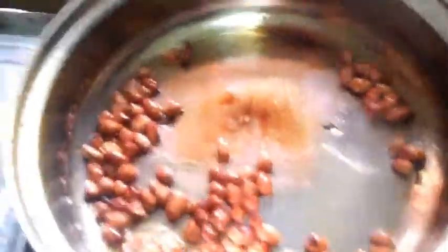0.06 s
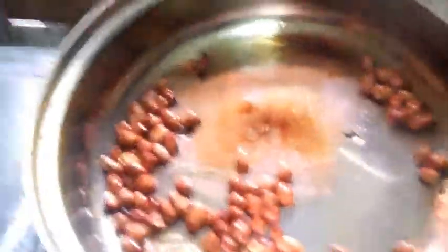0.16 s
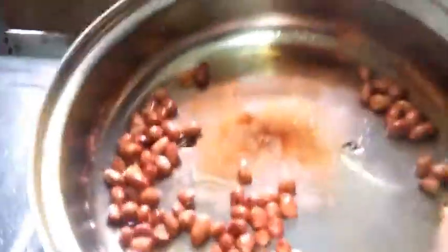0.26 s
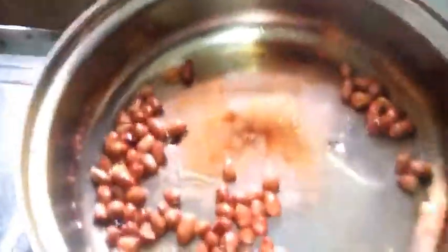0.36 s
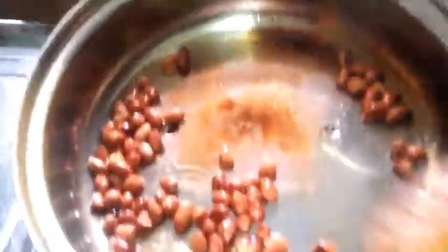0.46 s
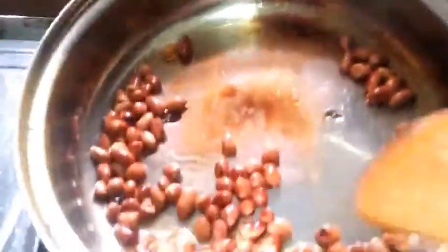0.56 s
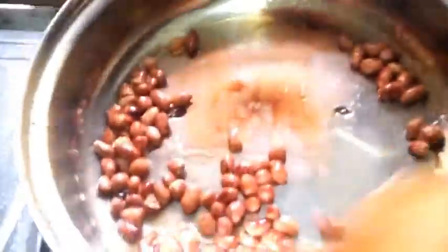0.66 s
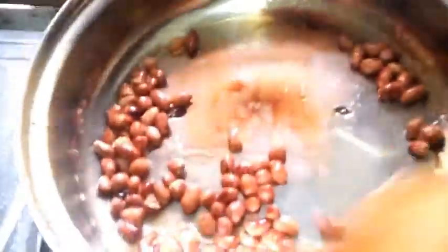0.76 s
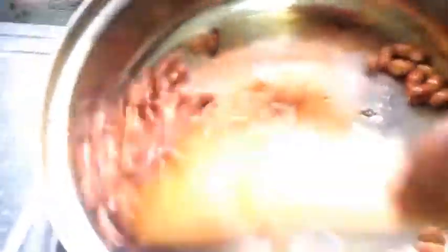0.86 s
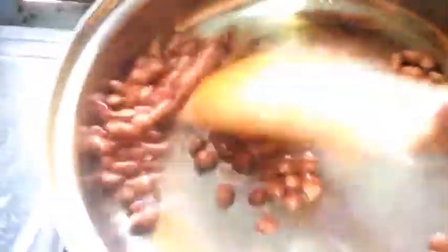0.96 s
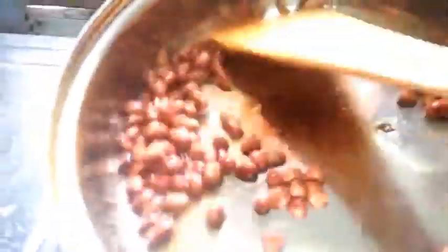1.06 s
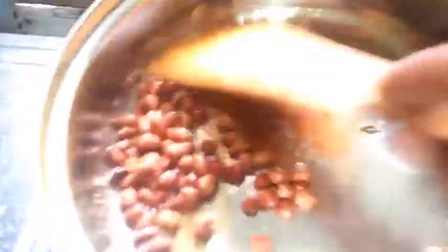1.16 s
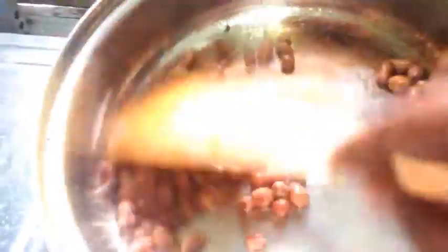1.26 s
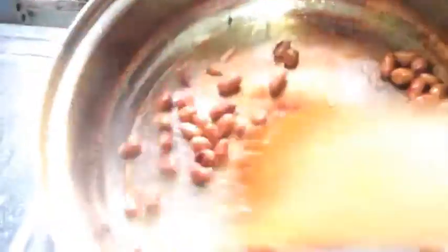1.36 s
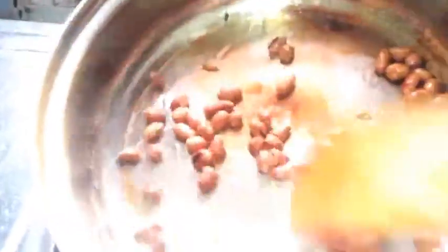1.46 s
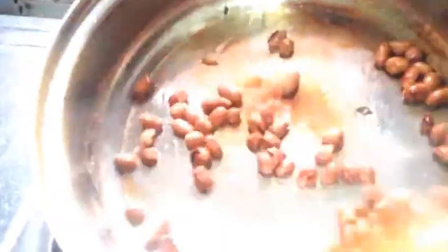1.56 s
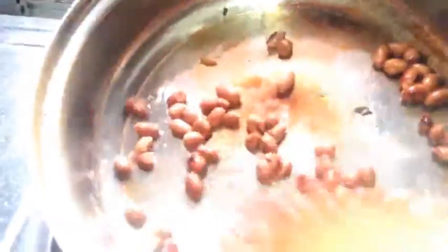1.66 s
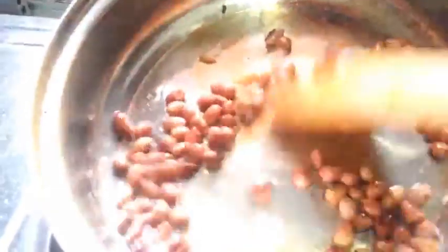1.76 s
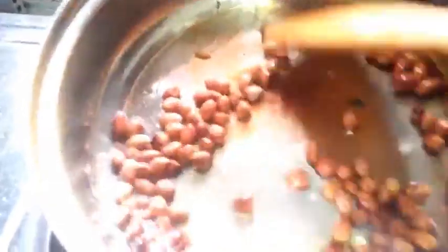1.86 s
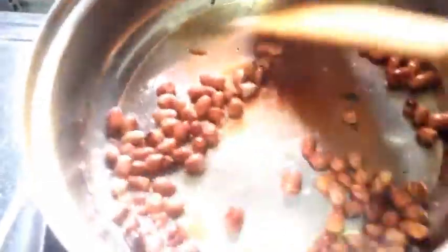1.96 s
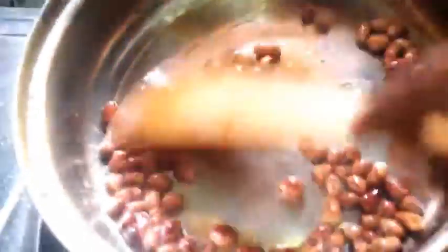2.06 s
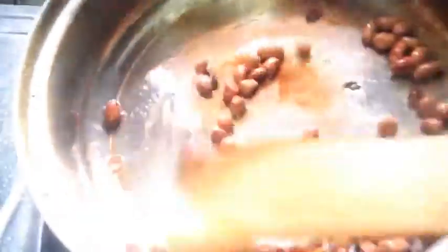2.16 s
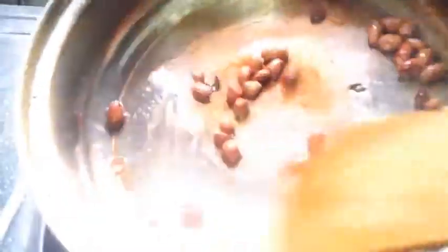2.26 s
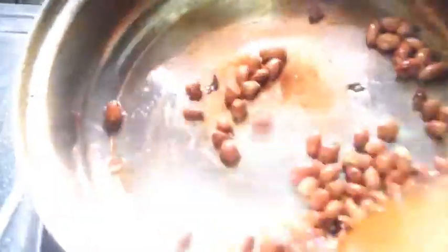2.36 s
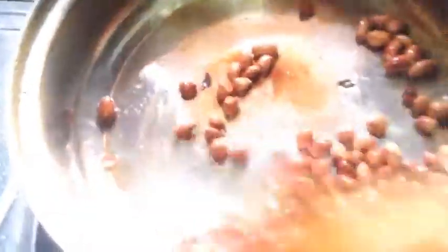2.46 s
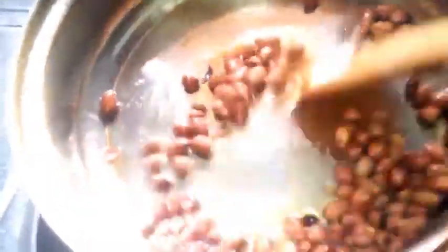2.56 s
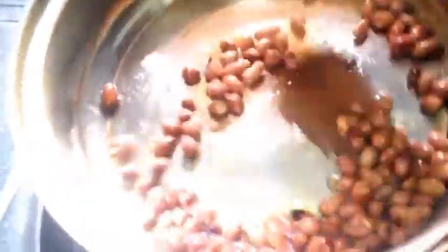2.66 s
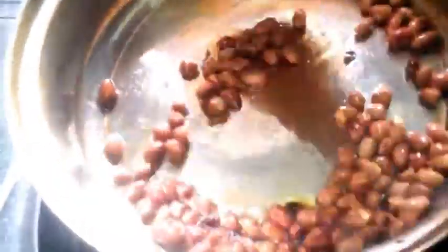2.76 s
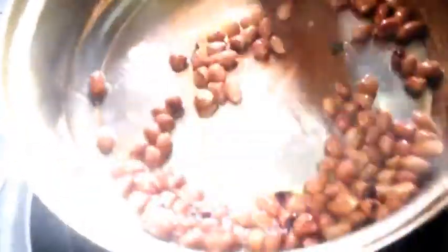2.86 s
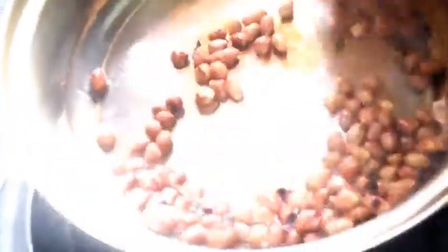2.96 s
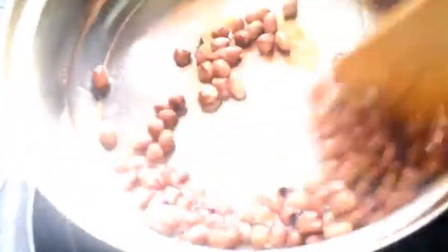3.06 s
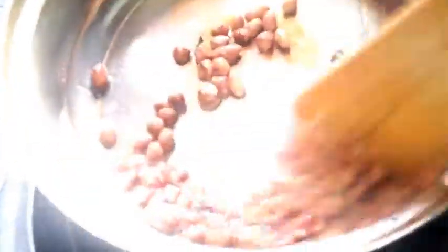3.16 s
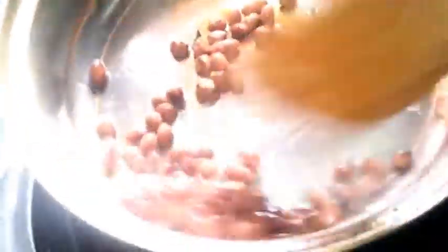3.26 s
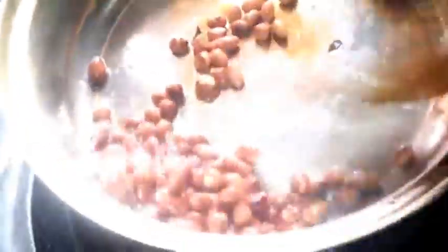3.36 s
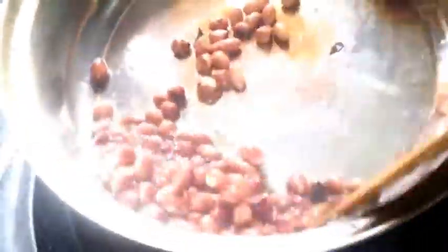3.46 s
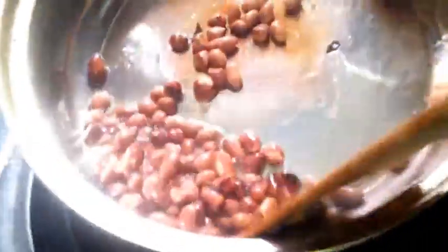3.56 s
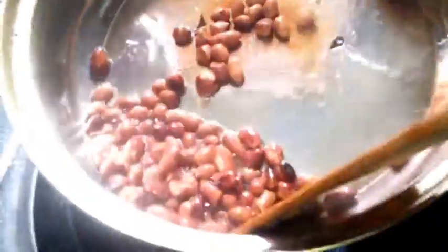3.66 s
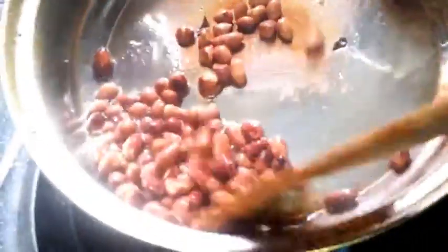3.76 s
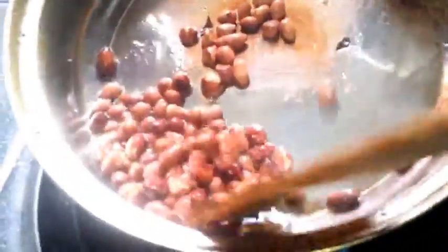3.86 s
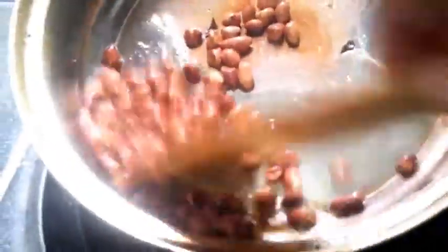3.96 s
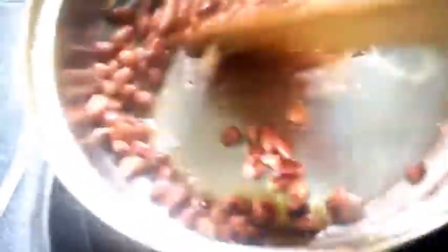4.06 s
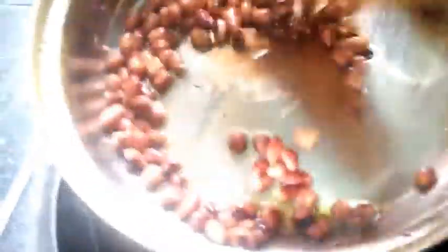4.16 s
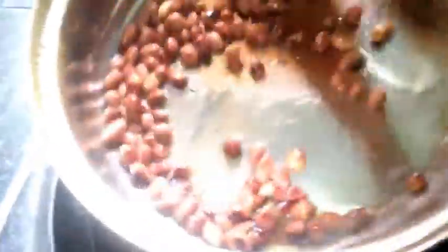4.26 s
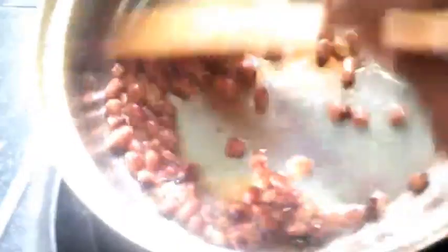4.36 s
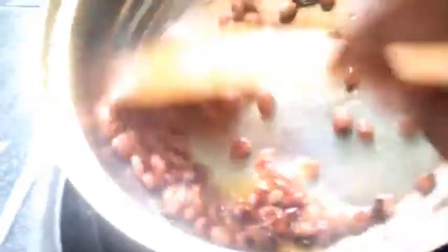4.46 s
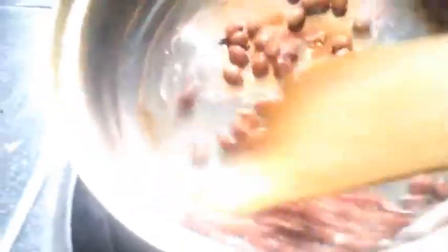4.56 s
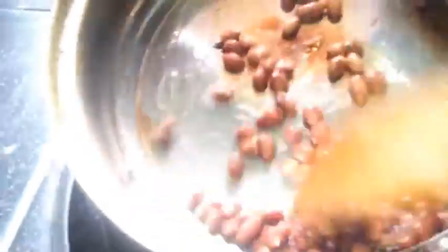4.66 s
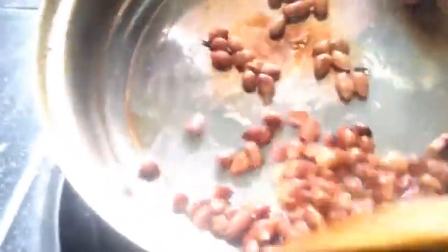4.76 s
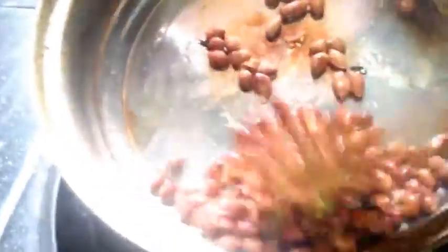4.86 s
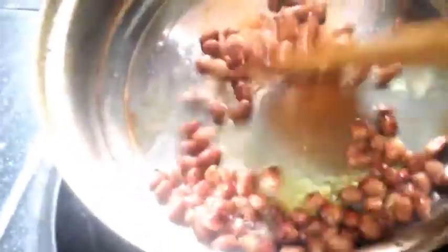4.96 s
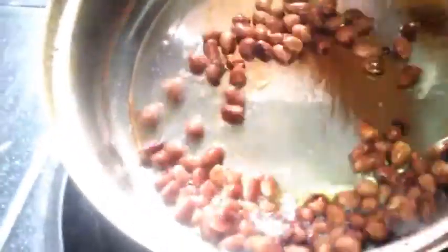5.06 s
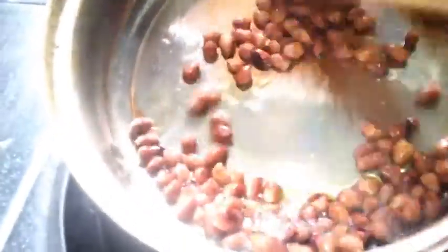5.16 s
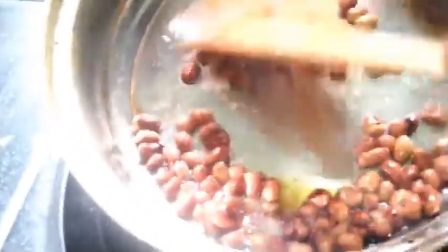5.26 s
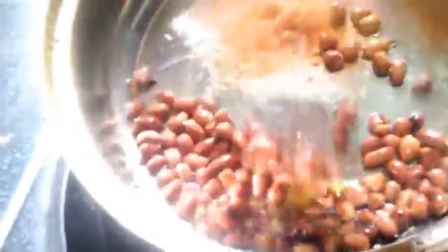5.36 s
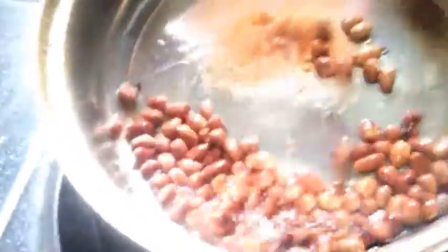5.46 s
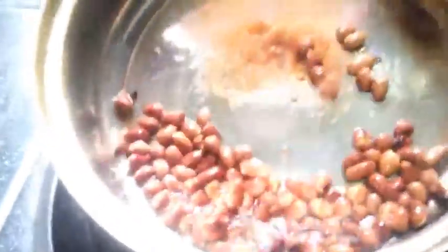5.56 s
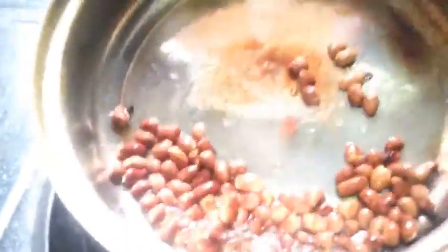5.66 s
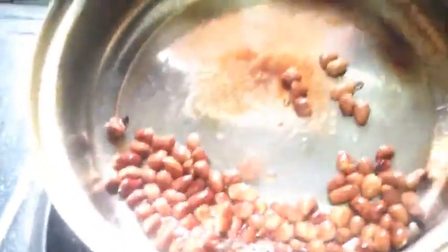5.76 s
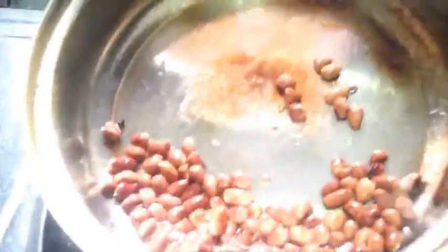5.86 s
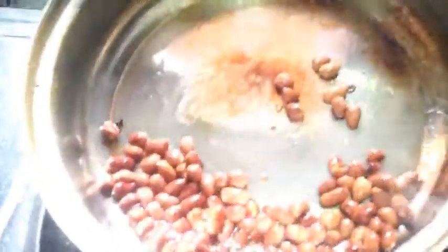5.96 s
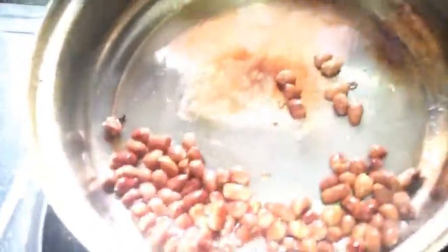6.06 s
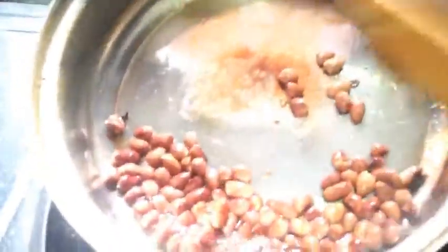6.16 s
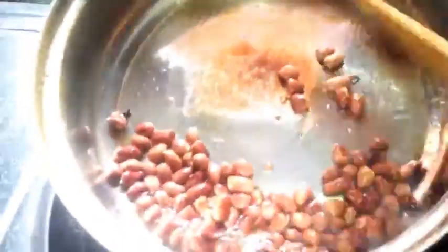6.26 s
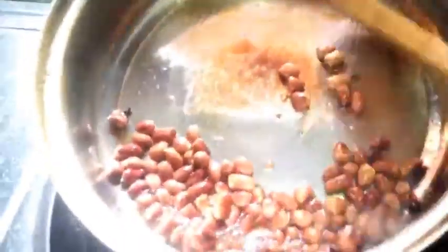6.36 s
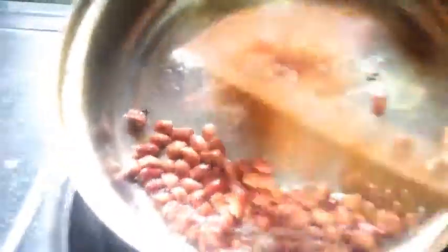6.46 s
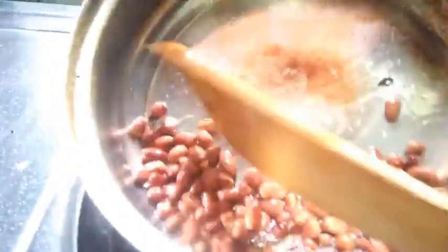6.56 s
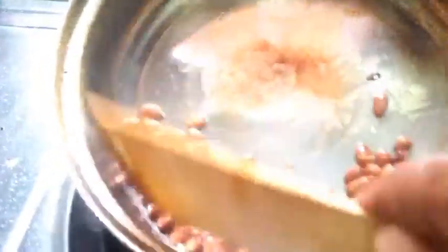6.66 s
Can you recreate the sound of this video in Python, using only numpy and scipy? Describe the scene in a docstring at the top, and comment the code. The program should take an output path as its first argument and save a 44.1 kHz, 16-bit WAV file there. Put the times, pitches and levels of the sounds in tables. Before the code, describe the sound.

Peanuts fry with a crisp, crackling sizzle in a steel pan while a wooden spatula knocks, scrapes and rattles them, giving one sharp squeak.

```python
"""In a small kitchen, peanuts fry in a little oil in a steel pan, heard from just above it.
Random clicks make the fizz; short noise bursts make the drops, and gliding tones the bubbles and steam.
A wooden spatula knocks and shoves the rattling nuts: noise bursts set the pan's notes ringing.
Once it sticks and slips with a sharp squeak, a wavering tone with overtones.
Filtered noise makes the quiet simmer and the stove's faint rumble underneath."""
import sys
import numpy as np
from scipy import signal
from scipy.fft import rfft, irfft
from scipy.io import wavfile
from scipy.ndimage import uniform_filter1d

SR = 44100
rng = np.random.default_rng(int(sys.argv[2]) if len(sys.argv) > 2 else 0)


def store_wav(level_fs):
    """Save 16-bit WAV to argv[1]."""
    pcm = np.round(np.clip(np.atleast_2d(level_fs), -1, 1) * 32767)
    wavfile.write(sys.argv[1], SR, pcm.T.astype(np.int16))


N = 295911


def undb(db):
    """Turn decibels into a gain."""
    return 10 ** (np.asarray(db) / 20)


def unit(x):
    """Scale to an rms of 1."""
    return x / np.sqrt(np.mean(x ** 2))


def energy(x):
    """Scale to a total energy of 1."""
    return x / np.linalg.norm(x)


def size_over(window_s, db):
    """Gain that gives a sound of energy 1 this level when averaged over the window."""
    return undb(db) * np.sqrt(window_s * SR)


def seconds(length):
    """Time axis of a short sound, at least 8 samples long."""
    return np.arange(max(int(length * SR), 8)) / SR


def curves(table):
    """Join the points of a table of (t/s, ...) by straight lines, one curve per column."""
    s, *columns = np.transpose(table)
    now = np.arange(N) / SR
    return [np.interp(now, np.sort(s), column) for column in columns]


def at_hz(spectrum, hz):
    """Gain of a (f/Hz, level/dB) spectrum at the given frequencies."""
    f, db = np.transpose(spectrum)
    return undb(np.interp(np.log(hz + 1), np.log(f), db))


def through(x, response):
    """Pass a sound through an impulse response."""
    return signal.fftconvolve(x, response)[:len(x)]


def colour(x, spectrum):
    """Filter with the given spectrum; folding the cepstrum keeps the filter from acting early."""
    size = 4096
    cepstrum = irfft(np.log(at_hz(spectrum, np.fft.rfftfreq(size, 1 / SR))))
    cepstrum[1:size // 2] *= 2
    cepstrum[size // 2 + 1:] = 0
    return through(x, irfft(np.exp(rfft(cepstrum))))


def band(x, hz, width):
    """One resonance, gain 1 at its centre."""
    hz = min(hz, SR / 2 - 2000)
    b, a = signal.iirpeak(hz, hz / min(width, SR / 3), fs=SR)
    return signal.lfilter(b, a, x)


def cut(x, order, hz, kind):
    """Keep only what lies below ("low") or above ("high") a frequency."""
    return signal.sosfilt(signal.butter(order, hz, kind, fs=SR, output="sos"), x)


def fading(t, t60):
    """Envelope that loses 60 dB in t60."""
    return np.exp(-np.log(1000) * t / t60)


def sweep_phase(hz):
    """Phase of a tone whose pitch changes from sample to sample."""
    return 2 * np.pi * np.cumsum(hz) / SR


def walk(rate):
    """Smooth random wandering with an rms of 1 and about this many new values per second."""
    k = int(SR / rate)
    steps = np.repeat(rng.standard_normal(N // k + 1), k)
    return unit(uniform_filter1d(steps, k)[:N])


def clicks(rate, spread_db):
    """Random clicks at this rate per second, many small and a few large."""
    size = undb(spread_db * np.minimum(rng.exponential(size=N), 5))
    return unit((rng.random(N) < rate / SR) * size * rng.choice([-1, 1], N))


def add(track, s, sound):
    """Mix a short sound in at time s."""
    i = int(s * SR)
    track[i:i + len(sound)] += sound[:N - i]


# how fiercely the oil fries: (t/s, level/dB before colouring and the final lift)
FIZZ = [(0.0, -46), (0.15, -54), (0.46, -61), (0.58, -53), (0.9, -49), (1.1, -50), (1.3, -44), (1.41, -51),
        (1.55, -47), (1.85, -46.5), (1.92, -47), (2.11, -41.5), (2.33, -43.5), (2.7, -44), (3.15, -44.5),
        (3.45, -43), (3.72, -39.5), (3.87, -54), (3.98, -52.5), (4.04, -39.5), (4.42, -40), (4.58, -46),
        (4.79, -42.5), (4.84, -46), (4.98, -41.5), (5.05, -45), (5.12, -42), (5.28, -44.5), (5.42, -52.5),
        (5.58, -53.5), (5.66, -45.5), (6.2, -50), (6.5, -45), (6.71, -56.5)]
# tone of the fizz: (f/Hz, level/dB)
FIZZ_COLOUR = [(900, -28), (1700, -69), (2500, -44.5), (3200, -26.5), (5000, -17.5), (6400, -13.5),
               (7800, 2), (9300, -2.5), (11000, -3), (14200, -12)]


def fizz():
    """Countless tiny steam bubbles, with sharper crackle when the oil is stirred up."""
    db, = curves(FIZZ)
    clumps_db = 1.7 * walk(30) + 1.5 * walk(160)
    fine = clicks(rate=7500, spread_db=2.0) * undb(db + clumps_db)
    crackle_db = 3.5 + db + 0.28 * np.minimum(db + 27.5, 0)  # drops faster than the fizz
    crackle = clicks(rate=230, spread_db=7.5) * undb(crackle_db)
    t = seconds(0.022)
    film = rng.standard_normal(len(t)) * fading(t, 0.038)  # the torn oil film flutters briefly
    film[0] += 6
    return colour(fine + through(crackle, energy(film)), FIZZ_COLOUR) * undb(6.0)


def bubbles(count=650):
    """Mid-sized bubbles ring for a few cycles each; they come where the frying is fierce."""
    db, = curves(FIZZ)
    out, t = np.zeros(N), seconds(0.005)
    chance = np.cumsum(undb(2 * np.minimum(db, -41) + 5 * walk(20)))
    for when, pitch, size in rng.random((count, 3)):
        i = np.searchsorted(chance, when * chance[-1])
        hz = 6300 * 2.15 ** pitch
        cycles = hz * t
        ping = np.sin(2 * np.pi * cycles) * fading(cycles, 36) * (1 - np.exp(-cycles / 1.5))
        add(out, i / SR, ping * undb(db[i] + 4.0 + 7.3 * size ** 3))
    return out


SPRAY_DECAY_S, SPRAY_TAIL_DB = 0.00168, -21  # time constant; the longer tail of the spray
SNAP_WIDTH, SNAP_LOW_CUT = 0.39, 0.49  # as shares of the centre frequency
SNAP_BODY_DB = -2  # the burst without the low cut


def snap(hz, t):
    """One drop bursting: a sharp click and a little ragged spray, coloured by the size of the drop."""
    spray_level = np.exp(-t / SPRAY_DECAY_S) + undb(SPRAY_TAIL_DB) * fading(t, .04)
    spray = rng.standard_normal(len(t)) ** 3 * spray_level  # the cube makes it ragged
    burst = band((t == 0) + energy(spray), hz, SNAP_WIDTH * hz)
    top = cut(burst, 4, min(SNAP_LOW_CUT * hz, SR / 4), "high")
    return energy(top + undb(SNAP_BODY_DB) * burst)


# the loudest drops bursting in the oil: (t/s, level/dB over 4 ms before the gains below, centre f/Hz)
POPS = [(1.2145, -27.5, 9200), (1.4505, -26.5, 8750), (1.9446, -33, 11900), (2.1253, -26, 8300),
        (2.165, -30, 8540), (2.3854, -31.5, 7500), (2.4225, -39, 8250), (2.436, -30, 6500),
        (2.4387, -25, 5400), (2.6112, -25, 6300), (2.6816, -34, 8400), (2.694, -30.5, 9500),
        (2.768, -23, 7320), (2.7795, -34, 10000), (2.785, -29.5, 8650), (2.8192, -30, 10900),
        (2.9212, -29.5, 10000), (3.1972, -30.5, 10350), (3.236, -24, 9000), (3.3135, -25, 13300),
        (3.3687, -19.5, 9700), (3.455, -35.5, 7450), (3.562, -23.5, 11000), (3.6285, -30, 8550),
        (3.639, -32, 9500), (4.0123, -25, 11000), (4.024, -29.5, 9100), (4.043, -35, 7100),
        (4.109, -32, 11400), (4.0976, -28.5, 9900), (4.148, -34, 8100), (4.155, -21, 10400),
        (4.233, -24.5, 11500), (4.237, -22, 10600), (4.245, -37, 10700), (4.2804, -20.5, 8270),
        (4.4293, -29, 7300), (4.456, -33, 10700), (4.491, -25, 10400), (4.503, -32.5, 8200),
        (4.5312, -31.5, 9100), (4.6052, -34, 8700), (4.62, -37, 8100), (4.626, -32.5, 8200),
        (4.6461, -22, 11100), (4.6586, -28.5, 9900), (4.6787, -22, 10700), (4.683, -20, 9000),
        (4.696, -26, 10000), (4.746, -33, 9500), (4.749, -39, 11100), (4.7615, -27, 10200),
        (4.7688, -34, 10300), (4.879, -34, 6130), (4.9092, -24.5, 12500), (4.9816, -31, 9000),
        (5.0711, -30.5, 10100), (5.106, -27.5, 11200), (5.3017, -33, 11400), (5.6038, -31, 8300),
        (5.6193, -34, 9000), (5.846, -24, 10500), (5.8925, -39, 9000), (5.9272, -37.5, 12500),
        (5.944, -27.5, 10270), (5.962, -27, 8200), (5.9821, -25.5, 9800), (6.0399, -38, 11000),
        (6.1744, -37.5, 12100)]
# a low-pitched drop is a big one and ticks the steel harder: level at the reference pitch, before the gain
TICK_DB, TICK_REF_HZ = -28, 9500
TICK_DB_PER_OCTAVE, TICK_MAX_DB = 46.5, -9  # rise per octave down; ceiling
CRACK_GAIN_DB, TICK_GAIN_DB = 1.5, 10.0


def pops():
    """Larger drops burst with a sharp snap, throw a little spray and tick the steel."""
    cracks, ticks, t = np.zeros(N), np.zeros(N), seconds(0.066)
    for s, db, hz in POPS:
        noise = rng.standard_normal(len(t)) * fading(t, 0.022)
        tick = band(band(noise, 1300, 1900), 5600, 4000)
        tick_db = min(TICK_DB + TICK_DB_PER_OCTAVE * np.log2(TICK_REF_HZ / hz), TICK_MAX_DB)
        size = size_over(.004, db)
        add(cracks, s, size * snap(hz, t))
        add(ticks, s, size * undb(tick_db) * energy(tick))
    return undb(CRACK_GAIN_DB) * cracks + undb(TICK_GAIN_DB) * ticks


# small drops: the weakest against the FIZZ level, how much stronger they can be, and their pitches
SPUTTER_DB, SPUTTER_RANGE_DB, SPUTTER_LOW_HZ, SPUTTER_HIGH_HZ = -6, 10.5, 7400, 14100
# in a cluster: the mean gap, and how much weaker each drop is than the one before
CLUSTER_GAP_S, CLUSTER_FADE_DB = .005, 2


def sputter(count=95):
    """Small drops snap wherever the oil fries hard; each sets off up to three weaker ones just after it."""
    db, = curves(FIZZ)
    out, t = np.zeros(N), seconds(.02)
    chance = np.cumsum(undb(3 * np.minimum(db, -42) + 4 * walk(15)))
    for when, strength, brood in rng.random((count, 3)):
        i = np.searchsorted(chance, when * chance[-1])
        size = size_over(.004, db[i] + SPUTTER_DB + SPUTTER_RANGE_DB * strength ** 1.5)
        for k in range(1 + int(4 * brood)):
            hz = SPUTTER_LOW_HZ * (SPUTTER_HIGH_HZ / SPUTTER_LOW_HZ) ** rng.random()
            add(out, min(i, N - 1) / SR, size * undb(-CLUSTER_FADE_DB * k) * snap(hz, t))
            i += int(rng.exponential(CLUSTER_GAP_S) * SR)
    return out


# big bubbles that ring for a moment: (t/s, level/dB of the ring over 4 ms, starting f/Hz)
PINGS = [(1.982, -37.5, 6880), (2.013, -39, 7300), (2.058, -33, 7540), (2.07, -35, 7300),
         (2.083, -35, 6950), (2.394, -31, 7440), (2.4003, -30.5, 6330), (2.405, -29, 8000),
         (2.5445, -28, 9000), (3.5478, -28, 6850), (5.928, -29.5, 8300), (6.04, -31.5, 8060)]
PING_CYCLES, PING_GLIDE = 94, .06  # cycles to lose 60 dB; rise of the pitch meanwhile, as a share


def pings():
    """A big bubble opens and rings briefly, rising in pitch as it collapses."""
    out, t = np.zeros(N), seconds(.02)
    for s, db, hz in PINGS:
        cycles = hz * t
        phase = 2 * np.pi * cycles * (1 + PING_GLIDE * cycles / PING_CYCLES / 2)
        ring = np.sin(phase) * fading(cycles, PING_CYCLES) * (1 - np.exp(-cycles / 2))
        add(out, s, size_over(.004, db) * (energy(ring) + undb(-3) * snap(hz, t)))
    return out


# wet nuts land on hot steel in a flurry of crackle: (t/s, length/s, level/dB, centre f/Hz)
FLURRIES = [(1.914, 0.19, -49.5, 7760), (3.374, 0.03, -31, 8300), (4.604, 0.12, -36.5, 9500),
            (4.778, 0.037, -43, 10500), (5.934, 0.052, -45, 9500)]


def flurries():
    """Many small drops burst close together in a ragged crackle that swells and dies."""
    out, t = np.zeros(N), seconds(0.0048)
    drop = rng.standard_normal(len(t)) * fading(t, 0.0069)
    crackle = through(clicks(rate=2700, spread_db=4), drop)
    for s, length, db, hz in FLURRIES:
        swell = np.sin(np.pi * seconds(length) / length)
        burst = crackle[int(s * SR):][:len(swell)] * swell
        add(out, s, undb(db) * unit(band(band(burst, hz, 1.3 * hz), hz, 2.4 * hz)))
    return out


# jets of steam from under wet nuts: (t/s, length/s, start f/Hz, end f/Hz, level/dB)
SPITS = [(2.433, 0.035, 5200, 3310, -38.5), (2.455, 0.042, 7930, 10150, -30.5),
         (4.69, 0.022, 9550, 8000, -48)]


def spits():
    """Steam hisses through a narrow gap whose pitch slides as it opens or closes."""
    out = np.zeros(N)
    for s, length, start_hz, end_hz, db in SPITS:
        t = seconds(length)
        tone = np.sin(sweep_phase(np.geomspace(start_hz, end_hz, len(t))))
        flutter = cut(rng.standard_normal(len(t)), 2, 800, "low")
        swell = np.sin(np.pi * t / length)
        add(out, s, undb(db) * unit(flutter * tone * swell))
    return out


def ringing(modes, t, scatter_db=0):
    """Modes (f/Hz, level/dB, t60/s) that swell and die; their strengths scatter with the spot struck."""
    out = 0
    for hz, db, t60 in modes:
        gain = undb(db + scatter_db * rng.uniform(-0.81, 1))
        tone = np.sin(2 * np.pi * (hz * t + rng.random()))
        out = out + gain * tone * fading(t, t60) * (1 - np.exp(-t * hz / 0.6))
    return out


# notes of the steel pan on its stand: (f/Hz, level/dB, time to lose 60 dB t60/s)
PAN = [(205, -10, .13), (271, -5, .2), (332, -10, .15), (445, -6, .1), (560, -5, .17), (643, -8, .14),
       (777, -12, .14), (985, -7, .16), (1026, -6, .22), (1078, -2, .27), (1170, -3, .2), (1231, 0, .33),
       (1405, -7, .2), (1660, -6, .13), (1830, -3, .17), (1922, -9, .2), (2290, -3, .12), (2515, -4, .1)]
# the spatula's clack with its woody resonances: (f/Hz, level/dB)
WOOD = [(40, -62), (110, -15), (260, -5.5), (600, -3), (900, 0), (1180, 3), (1340, -6.5), (1750, 6.5),
        (2080, -7), (2350, -1), (2700, -4), (3050, -8), (3500, -12.5), (4100, -16), (6000, -18),
        (14000, -29)]


def pan_response(ring_db, wood_t60):
    """One contact: a dry clack that dies quickly, and the longer modes of the steel."""
    t = seconds(.5)
    clack = colour(rng.standard_normal(len(t)) * fading(t, wood_t60), WOOD)
    steel = ringing(PAN, t, scatter_db=7)
    return unit(clack) + undb(ring_db) * unit(steel)


# spatula blows: (t/s, level/dB over 15 ms, thud/dB before its trim, f/Hz favoured by the spot,
# contact time/s, ring of the steel/dB against the clack)
KNOCKS = [(0.681, -36.5, -3, 1580, 0.0021, 3), (0.814, -41.5, -1, 1760, 0.0037, -2),
          (0.842, -27.5, -4.5, 1650, .005, -4), (0.906, -37, -16, 1890, 0.019, -6),
          (0.966, -33.5, -7, 1660, 0.019, -2), (1.167, -33, -29, 1270, 0.0034, -9),
          (1.243, -44, 9, 1084, 0.0038, -0.5), (1.262, -38.5, -10, 1450, .005, -3),
          (1.296, -35, -12, 1405, 0.0021, -7), (1.45, -40, -10, 1230, 0.0098, 1.5),
          (1.647, -33, -10.5, 1390, 0.0036, 8), (1.73, -37.5, -1.5, 920, 0.004, 9),
          (1.737, -23, -6, 1710, 0.0024, -9.5), (1.745, -29.5, -9, 1231, 0.0024, -3.5),
          (2.051, -38.5, -26, 1076, 0.00075, -6), (2.155, -37.5, -33, 1090, 0.015, -3),
          (2.22, -43.5, -10, 1140, 0.0058, 8), (2.336, -29, -24, 1850, 0.004, 5),
          (2.517, -33, -6, 2330, 0.0047, 8.5), (2.535, -29, -4.5, 1960, 0.012, -5),
          (2.611, -32.5, -12.5, 1040, 0.00039, -5.5), (2.722, -35.5, -52, 1750, 0.0017, -1),
          (2.861, -37, -18, 1670, 0.00087, -9), (2.933, -30, -20, 1110, .003, 4),
          (3.017, -35.5, -9.5, 1020, 0.0012, -4), (3.094, -32.5, -4.5, 1070, 0.003, -2),
          (3.342, -35.5, -19.5, 2380, 0.0028, -12), (3.418, -33.5, -7.5, 1130, 0.012, 0),
          (3.5, -37, 0.5, 2320, 0.0011, 8.5), (3.547, -32, -3, 1070, 0.0019, 14),
          (3.572, -31.5, -19, 1110, 0.007, -9.5), (4.027, -39.5, -8, 1210, 0.0084, -2.5),
          (4.231, -37.5, -21, 1180, 0.022, -9), (4.429, -31, -19, 1050, 0.0007, -11),
          (4.878, -30.5, -2.5, 1530, 0.0026, 10.5), (4.982, -33, -7.5, 1050, 0.0057, -4.5),
          (5.275, -34.5, -13.5, 1170, 0.0014, -4), (6.418, -40, 11.5, 780, 0.011, -2.5),
          (6.435, -32, -13, 1610, 0.0011, -31), (6.486, -31.5, -9.5, 1420, 0.0056, -21),
          (6.497, -35, -23, 986, 0.0022, -4)]
# notes of the rim, heard mostly when a blow sets the steel ringing hard: (f/Hz, level/dB, t60/s)
RIM = [(2470, -2, .19), (2540, -5, .09), (2760, -2, .09), (2835, -1, .1), (3620, -1, .11), (3690, -3, .09),
       (3868, 0, .09)]
RIM_DB = -22  # against the body of the blow; it grows twice as fast as the ring
# a spot with higher modes is harder: the treble at a spot of HARD_REF_HZ and its rise per octave
HARD_DB, HARD_REF_HZ, HARD_DB_PER_OCTAVE = 2, 1640, 33
# a light touch lets the spot ring, a heavy one damps it: level, loss per dB of thud, time to lose 60 dB
SPOT_DB, SPOT_DAMPING, SPOT_T60_S, SPOT_WIDTH_HZ = -11, 0.62, 0.053, 260


def knocks():
    """Wood meets steel and chatters; a heavy blow thuds, a hard one favours the upper modes."""
    out, t = np.zeros(N), seconds(.5)
    for s, db, thud_db, spot_hz, contact, ring_db in KNOCKS:
        hard_db = HARD_DB + HARD_DB_PER_OCTAVE * np.log2(spot_hz / HARD_REF_HZ)
        tone = [(130, thud_db + 4.5), (350, thud_db + 2.0), (1100, 0.0053), (2300, hard_db), (6000, hard_db - 12)]
        chatter = rng.standard_normal(len(t)) * (t / contact) * np.exp(-t / contact * 2.34)
        clack = colour(chatter, WOOD)
        build = 1 - np.exp(-t / contact)  # the steel takes up the blow while the contact lasts
        steel = build * pan_response(ring_db=2.0, wood_t60=0.071)
        body = energy(clack) + undb(ring_db) * energy(steel)
        judder = rng.standard_normal(len(t)) * build * fading(t, SPOT_T60_S)
        spot = band(band(judder, spot_hz, SPOT_WIDTH_HZ), spot_hz, 2 * SPOT_WIDTH_HZ)
        spot_db = SPOT_DB - SPOT_DAMPING * thud_db
        rim_db = RIM_DB + 2 * ring_db + min(hard_db, 0) / 2
        blow = energy(colour(body, tone)) + undb(spot_db) * energy(spot)
        blow = blow + undb(rim_db) * energy(ringing(RIM, t))
        add(out, s, undb(db) * blow / np.std(blow[:int(.015 * SR)]))
    return out


# single nuts clack on the steel: (t/s, level/dB of the click over 8 ms, centre f/Hz)
CLACKS = [(0.86, -36.5, 2200), (0.924, -40, 2160), (0.986, -40, 1490), (1.003, -41, 2070),
          (1.028, -47, 2520), (1.076, -41, 1650), (1.086, -41, 1210), (1.296, -43.5, 2840),
          (1.323, -48, 1790), (1.485, -41.5, 1810), (1.711, -36, 1900), (1.843, -39, 3430),
          (1.915, -39.5, 1690), (1.95, -41, 3370), (2.052, -37, 1680), (2.222, -34.5, 1640),
          (2.362, -36.5, 2300), (2.935, -37.5, 2370), (3.079, -45, 2520), (3.095, -37, 2170),
          (3.526, -36, 2640), (4.064, -35.5, 1010), (4.368, -39.5, 1070), (4.374, -38, 1860),
          (4.431, -32, 1870), (4.679, -35, 2540), (4.953, -36.5, 1026), (5.105, -57, 1870),
          (5.219, -39, 1280), (5.278, -37, 1910), (5.327, -40, 1680)]
CLACK_T60_S, CLACK_WIDTH, CLACK_RING_DB = 0.037, 0.17, -21  # width as a share of the centre; pan's answer


def clacks():
    """A nut hits the steel: a short hollow click, answered by the pan's nearest modes."""
    out, t = np.zeros(N), seconds(.3)
    for s, db, hz in CLACKS:
        shell = rng.standard_normal(len(t)) * fading(t, CLACK_T60_S)
        click = energy(band(band(shell, hz, CLACK_WIDTH * hz), hz, 2 * CLACK_WIDTH * hz))
        answer = energy(band(ringing(PAN + RIM, t), hz, CLACK_WIDTH * hz))
        add(out, s, size_over(.008, db) * (click + undb(CLACK_RING_DB) * answer))
    return out


# stirring, nuts and wood sliding on steel: (t/s, level/dB before the final trim)
STIR = [(0.0, -59), (0.66, -61), (0.9, -38.5), (1.29, -44.5), (2.0, -51), (3.42, -41), (3.64, -41.5),
        (3.85, -74), (4.05, -42.5), (4.54, -39), (4.73, -47), (4.84, -57), (4.93, -43), (5.15, -47),
        (5.42, -49), (5.64, -66), (6.38, -91.5), (6.43, -54), (6.52, -36), (6.6, -47), (6.71, -57)]
# treble of the stirring, against its lower part: (t/s, level/dB)
STIR_TREBLE = [(1.03, 7.5), (1.2, -6), (2.2, 5), (2.5, -6), (3.15, 5), (4.1, -5.5), (5.4, -7), (6.4, -7)]


def stirring():
    """Nuts tumble densely on spots of different colour as the spatula shoves them around."""
    db, = curves(STIR)
    treble_db, = curves(STIR_TREBLE)
    rattle = 0
    spots = [(270, 6), (560, -1.0), (800, 2.0), (1100, -6), (1700, -2), (2400, -4), (3300, 9)]  # f/Hz, level/dB
    for spot_hz, spot_db in spots:
        response = pan_response(ring_db=-3, wood_t60=0.04)
        response = band(response, spot_hz, 400) + undb(-11) * response
        tumbles = clicks(rate=80, spread_db=2.8)
        rattle = rattle + undb(spot_db) * through(tumbles, response)
    rattle = unit(rattle)
    low = cut(rattle, 3, 1900, "low")
    high = cut(rattle, 3, 1900, "high")
    return (low + undb(treble_db) * high) * undb(db - 7.5)


# the weakest bump against the STIR level, how much stronger bumps can be, their pitches and ring time
JOSTLE_DB, JOSTLE_RANGE_DB, JOSTLE_LOW_HZ, JOSTLE_HIGH_HZ, JOSTLE_T60_S = -4, 10, 750, 2400, .03


def jostling(count=230):
    """Pushed nuts bump into each other: small dry clicks, each of its own pitch."""
    db, = curves(STIR)
    out, t = np.zeros(N), seconds(0.037)
    chance = np.cumsum(undb(np.minimum(db, -44) + 3 * walk(18)))
    for when, pitch, strength in rng.random((count, 3)):
        i = np.searchsorted(chance, when * chance[-1])
        hz = JOSTLE_LOW_HZ * (JOSTLE_HIGH_HZ / JOSTLE_LOW_HZ) ** pitch
        shell = rng.standard_normal(len(t)) * fading(t, JOSTLE_T60_S)
        size = size_over(.004, db[i] + JOSTLE_DB + JOSTLE_RANGE_DB * strength ** 2)
        add(out, i / SR, size * energy(band(band(shell, hz, hz / 3), hz, hz / 2)))
    return out


# sweeps of the blade: (t/s, length/s, f/Hz of the mode that sings,
# a quarter of its rms pitch waver/Hz, level/dB of the singing)
SWEEPS = [(1.459, 0.089, 1073, 11.6, -48), (1.879, 0.46, 1776, 34, -50), (2.142, 0.097, 1058, 7.4, -41),
          (2.946, 0.34, 1060, 13, -56), (3.43, 0.39, 1166, 9.5, -57), (4.039, 0.4, 1248, 3.8, -53),
          (4.233, 0.041, 1247, 4, -37), (4.538, 0.06, 1252, 6.8, -48.5), (4.05, 0.43, 1827, 28, -59),
          (5.042, 0.15, 1235, 7, -45.5), (5.275, 0.12, 1238, 3.6, -52)]
SWEEP_ATTACK_S, SWEEP_RELEASE_S = 0.0094, 0.018
SCRAPE_WIDTH_HZ, SCRAPE_DB = 800, -5  # scraping around the singing mode, against its level


def singing():
    """Sweeps of the blade catch and slip, and keep one lightly damped mode of the pan sounding."""
    out = np.zeros(N)
    catches = clicks(rate=190, spread_db=4)
    for s, length, hz, waver_hz, db in SWEEPS:
        t = seconds(length + .3)
        press = np.minimum(t / SWEEP_ATTACK_S, 1) * np.exp(-np.maximum(t - length, 0) / SWEEP_RELEASE_S)
        rub = undb(3.5 * walk(110)[:len(t)])
        phase = sweep_phase(hz + 4 * waver_hz * walk(1200)[:len(t)])
        scrape = band(catches[int(s * SR):][:len(t)], hz, SCRAPE_WIDTH_HZ)
        scrape = band(scrape, hz, SCRAPE_WIDTH_HZ)
        add(out, s, undb(db) * press * (unit(rub * np.sin(phase)) + undb(SCRAPE_DB) * unit(scrape)))
    return out


# the squeak: (t/s, pitch f/Hz, fundamental level/dB, octave level/dB, higher overtones level/dB)
SQUEAK = [(3.612, 1700, -50, -65, -65), (3.638, 1735, -37, -50, -48), (3.646, 1775, -22, -34, -28),
          (3.655, 1780, -23.5, -34, -21), (3.664, 1740, -22, -32, -27), (3.673, 1728, -31, -33, -32),
          (3.683, 1760, -16.5, -35, -35), (3.696, 1780, -19, -30, -23), (3.704, 1735, -21, -35, -31),
          (3.712, 1700, -19, -40, -36), (3.72, 1650, -19.5, -43, -43), (3.728, 1645, -20, -43, -46),
          (3.735, 1593, -18.5, -22, -30), (3.757, 1595, -14.5, -17, -23), (3.779, 1591, -11, -24, -31),
          (3.795, 1595, -11.5, -20, -35), (3.803, 1630, -22, -23, -40), (3.811, 1600, -22, -26, -44),
          (3.827, 1605, -25, -41, -48), (3.834, 1640, -42, -55, -60)]
# tone of the overtones above the octave: (f/Hz, level/dB)
SQUEAK_COLOUR = [(4770, -4), (5300, -15), (6360, -4.5), (7000, -1.5), (7950, 2), (8750, -17), (9550, 0),
                 (10400, -23), (11100, -10.5), (13000, -31)]
# a second, lower note joins and beats against it: (t/s, f/Hz, level/dB)
SECOND_NOTE = [(3.64, 1700, -42), (3.66, 1690, -31), (3.675, 1660, -34), (3.688, 1640, -36),
               (3.7, 1620, -25), (3.722, 1540, -23.5), (3.74, 1480, -37), (3.77, 1470, -52)]
# the wall modes that ring on when the blade lets go: (f/Hz, level/dB, t60/s)
WALL = [(1560, -34, .22), (1594, -28, .28), (1622, -32, .24), (1740, -42, .2), (3189, -28, .19),
        (4775, -42, .12)]
LET_GO_S = 3.8
# the squeak flutters (0-1), less and less as its pitch comes within LOCK_RANGE_HZ of the wall mode
LOCK_HZ, LOCK_RANGE_HZ, FLUTTER_FREE, FLUTTER_LOCKED = 1592, 70, .5, .17
RASP_DB = -9  # friction hiss, relative to the higher overtones


def squeak():
    """Stick-slip of wood on steel: it flutters, beats, steadies near a wall mode, then lets go."""
    hz, first_db, octave_db, upper_db = curves(SQUEAK)
    second_hz, second_db = curves(SECOND_NOTE)
    flutter = np.interp(abs(hz - LOCK_HZ), [0, LOCK_RANGE_HZ], [FLUTTER_LOCKED, FLUTTER_FREE])
    phase = sweep_phase(hz * (1 + .009 * flutter * walk(400)))
    tone = undb(first_db) * np.sin(phase) + undb(second_db) * np.sin(sweep_phase(second_hz))
    for k in range(2, 9):  # overtones at k times the pitch
        grip = 1 - flutter * np.tanh(walk(220))
        gain = undb(octave_db) if k == 2 else undb(upper_db) * at_hz(SQUEAK_COLOUR, k * hz)
        tone = tone + gain * grip * np.sin(k * phase + flutter * walk(300))
    hiss = unit(band(band(rng.standard_normal(N), 9000, 3170), 9000, 6000))
    rasp = hiss * (1 + np.sin(phase)) / 2  # the hiss pulses with the pitch
    now = np.arange(N) / SR
    sounding = (now > SQUEAK[0][0]) * (now < SQUEAK[-1][0])
    out = np.sqrt(2) * (tone + undb(RASP_DB + upper_db) * rasp) * sounding
    out = out * (1 + undb(-32) * walk(2500))  # slight roughness
    add(out, LET_GO_S, ringing(WALL, seconds(0.62)))
    return out


# wood grating on the steel: (t/s, length/s, level/dB, centre f/Hz)
GRATES = [(3.757, .006, -23, 8800), (3.8035, .002, -16.5, 6500), (3.808, .002, -17.5, 8700)]


def grates():
    """The wood grates harshly for a few milliseconds as it loses grip."""
    out = np.zeros(N)
    for s, length, db, hz in GRATES:
        noise = rng.standard_normal(len(seconds(length)))
        add(out, s, undb(db) * unit(band(band(noise, hz, 3000), hz, 9000)))
    return out


# tone of the quiet simmer heard through the pan: (f/Hz, level/dB)
SIMMER_COLOUR = [(250, -14), (450, -27), (800, 8.5), (1050, 2.5), (1300, -10), (1800, 15), (2500, 5),
                 (3300, 4.5), (5000, -26), (9000, -6)]


def simmer():
    """A smooth, quiet simmer sounds through the pan all the time, wavering a little."""
    return unit(colour(rng.standard_normal(N), SIMMER_COLOUR)) * undb(-61 + 1.5 * walk(15))


# tone of the stove rumble: (f/Hz, level/dB)
STOVE_COLOUR = [(20, -10), (45, -6), (75, -5), (100, 5.5), (130, -15), (190, -24), (300, -10), (600, -36),
                (1200, -17.5), (3000, -23.5)]
# loudness of the stove rumble: (t/s, level/dB)
STOVE = [(0.0, -55.5), (0.3, -59.5), (0.42, -59), (0.5, -52.5), (0.62, -53.5), (0.72, -59.5), (1.3, -57),
         (1.55, -66.5), (2.4, -52.5), (3.6, -54.5), (3.9, -73), (4.05, -56.5), (5.75, -67.5), (5.92, -59.5),
         (6.3, -64.5), (6.48, -52.5), (6.71, -61)]


def stove():
    """Noise filtered into a low, unsteady rumble."""
    db, = curves(STOVE)
    return unit(colour(rng.standard_normal(N), STOVE_COLOUR)) * undb(db + 1.5 * walk(35))


# echo bands of the kitchen: (centre f/Hz, width/Hz, level/dB, t60/s)
ROOM = [(357, 450, 2.5, 0.44), (1110, 11000, -16.5, 0.86), (3000, 2600, -9, 0.48), (9000, 5100, -10, 0.28)]


def kitchen(x):
    """Hard walls close by: a diffuse tail of fading noise, each band dying away at its own pace."""
    t = seconds(.6)
    tail = 0
    for hz, width, db, t60 in ROOM:
        echoes = rng.standard_normal(len(t)) * fading(t, t60) * (t > .004)  # first echo after 4 ms
        tail = tail + undb(db) * band(energy(echoes), hz, width)
    return through(x, tail)


def scene():
    """Everything sits in the middle; the treble flickers between the ears, as bubbles burst all over the pan."""
    contacts = pops() + pings() + flurries() + knocks() + clacks() + jostling() + spits() + grates()
    squeal = squeak()
    frying = contacts + fizz() + bubbles() + sputter()
    room = kitchen(contacts + undb(-8) * band(squeal, 2080, 2300))
    mid = frying + squeal + room + stirring() + simmer() + singing() + stove()
    treble = cut(frying, 6, 4300, "high")
    side = undb(-9.5) * treble * walk(2000)
    return np.array([mid + side, mid - side])


# tilt of the treble: (f/Hz, level/dB)
TREBLE_TILT = [(3000, -4), (4000, -3), (5400, -1), (9300, 1), (10300, -4), (12300, -2), (14000, 1)]
TOP_HZ = 14450


def record(dry):
    """The treble is tilted a little, and everything above TOP_HZ is cut steeply."""
    heard = np.array([colour(channel, TREBLE_TILT) for channel in dry])
    return signal.sosfilt(signal.ellip(10, .2, 70, TOP_HZ, fs=SR, output="sos"), heard)


dry = scene()
out = record(dry)
store_wav(out)
```